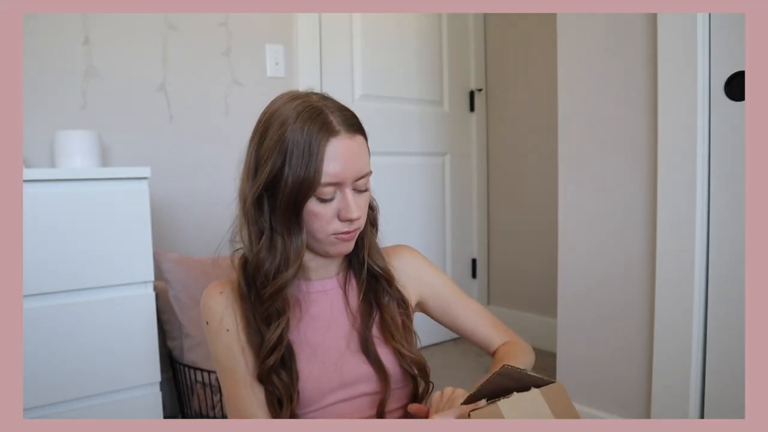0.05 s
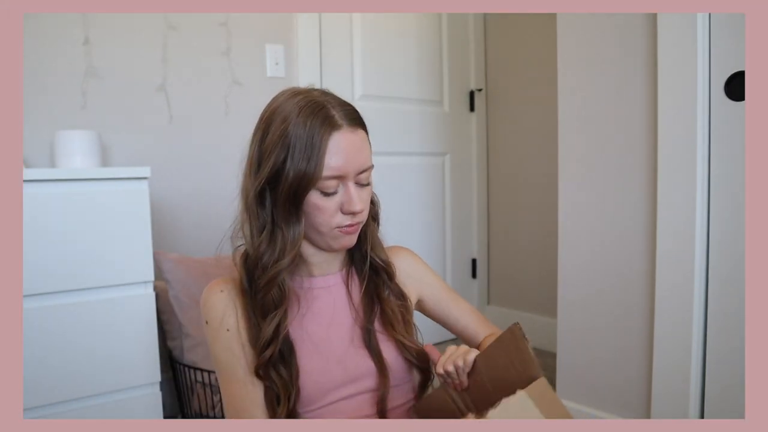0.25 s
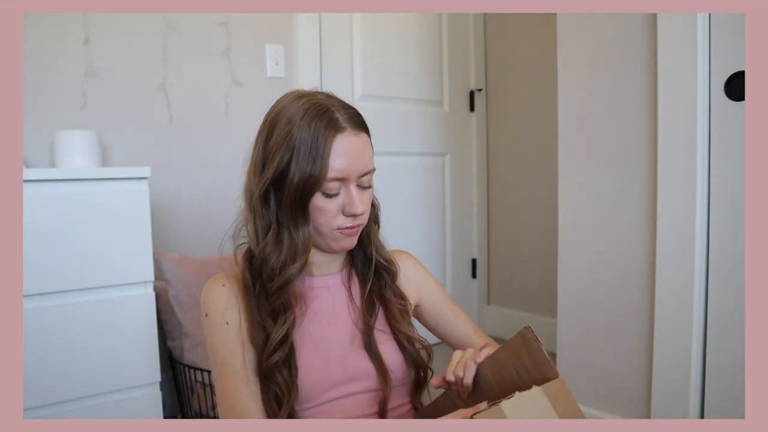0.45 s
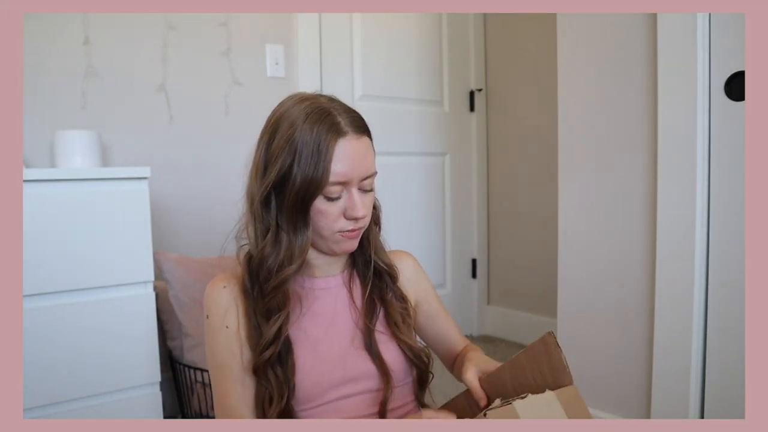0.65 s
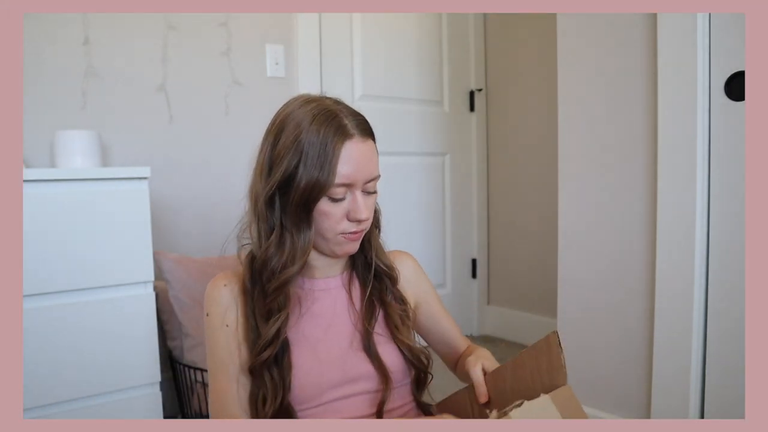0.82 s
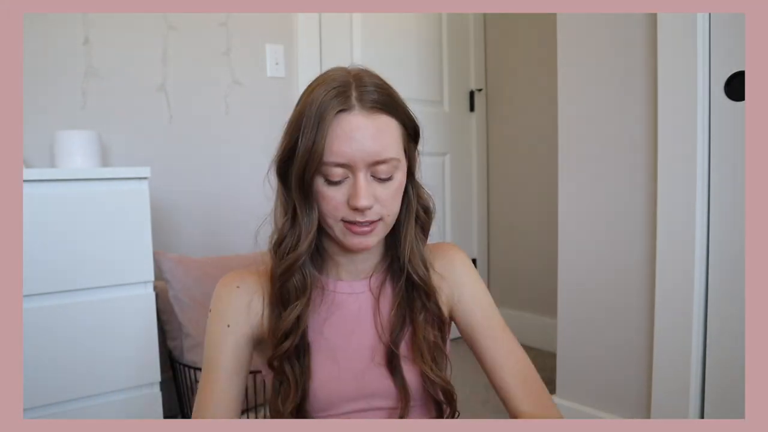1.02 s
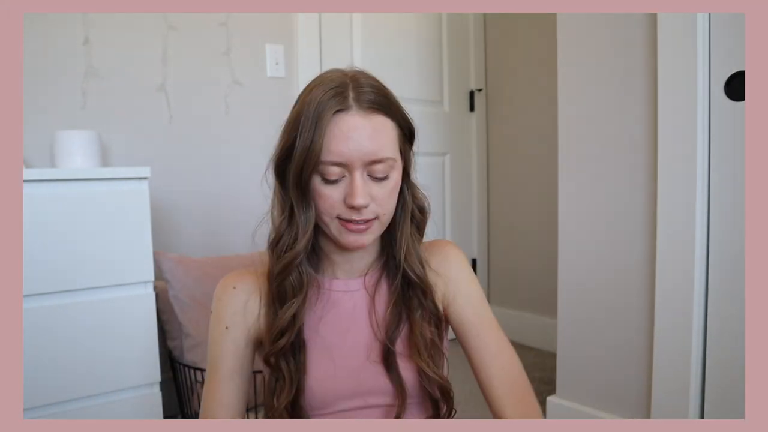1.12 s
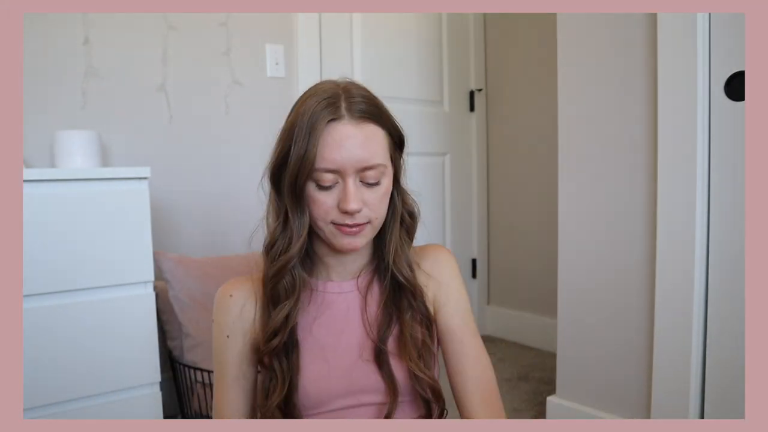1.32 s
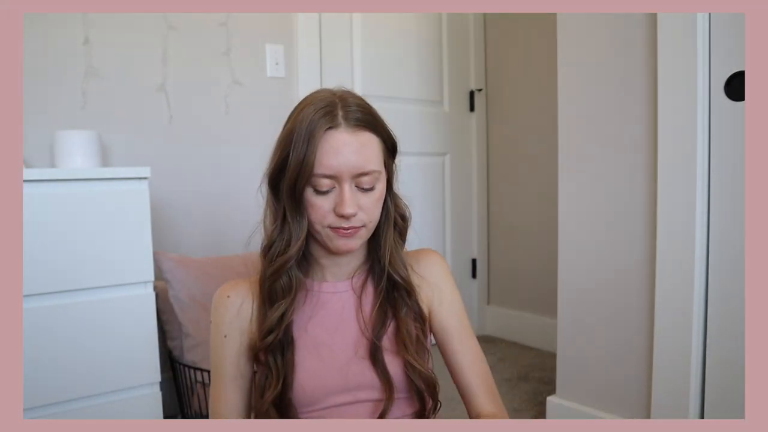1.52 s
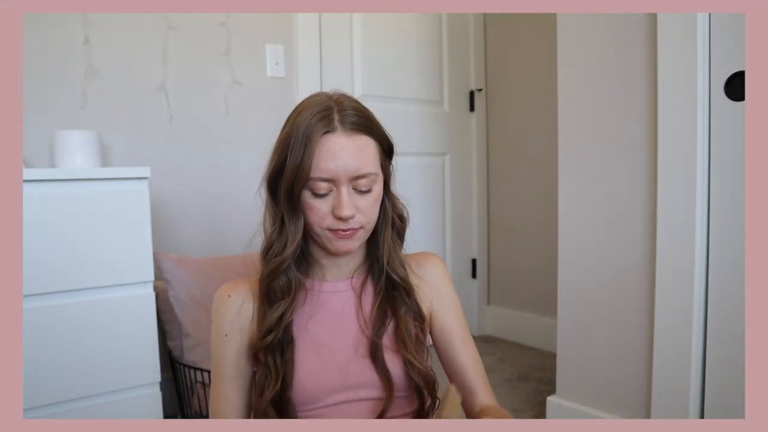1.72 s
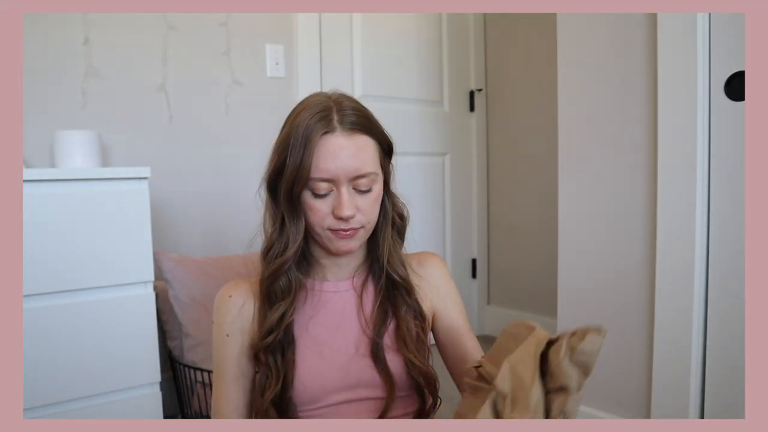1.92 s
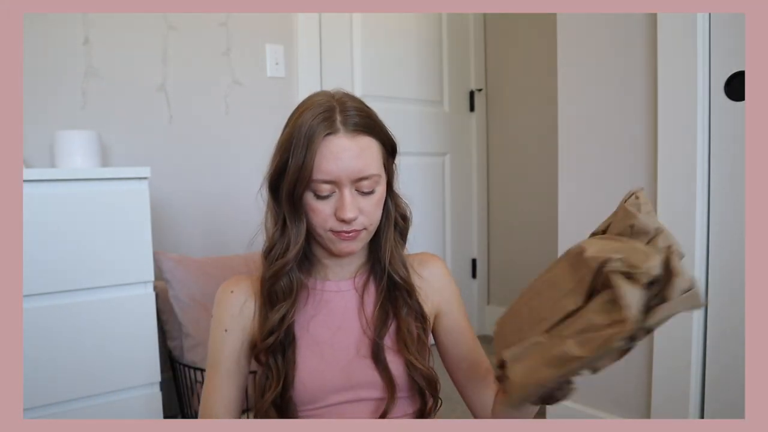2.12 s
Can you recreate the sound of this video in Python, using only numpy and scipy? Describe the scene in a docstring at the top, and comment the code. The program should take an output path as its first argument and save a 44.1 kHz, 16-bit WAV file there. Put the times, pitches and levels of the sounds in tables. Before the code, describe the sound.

Packing paper crinkles as it is pulled from a cardboard box after a flap slaps.

```python
"""Crumpled packing paper is pulled from a cardboard box in a small bedroom. Buckling makes its sound:
countless tiny facets merge into a dense rustle, and a few larger creases give way with sharp snaps.
Before that the box is opened: a flap slaps back and rattles, sliding hands raise friction noise,
and bumps excite the damped modes of the box. The level dips briefly just before the pull."""
import sys
import numpy as np
from scipy import signal
from scipy.fft import rfft, irfft, next_fast_len
from scipy.io import wavfile
from scipy.ndimage import uniform_filter1d

SR = 44100
rng = np.random.default_rng(int(sys.argv[2]) if len(sys.argv) > 2 else 0)


def unload_audio(sound):
    """Save the sound as a 16-bit wav file, at the path given as the first command line argument."""
    columns = np.transpose(np.atleast_2d(sound))
    # keep every value between -1 and 1, then stretch to whole-number steps
    steps = np.round(np.clip(columns, -1, 1) * 32767)
    wavfile.write(sys.argv[1], SR, steps.astype(np.int16))


N = 94815

# Reverberation time of the bedroom: frequency_hz, t60_s
ROOM_DECAY = [(100, 0.22), (300, 0.41), (1200, 0.51), (4000, 0.25), (14000, 0.2)]
# Background noise spectrum: frequency_hz, level_db
BACKGROUND_SPECTRUM = [(20, -5), (55, -1), (300, -4.5), (1000, -24), (3000, -28), (16000, -21)]
# Box panels ringing on: start_s, pitch_hz, level_db, t60_s
PANEL_RINGS = [(.262, 1211, -22, .26), (.262, 1136, -31, .42), (.562, 301, -26, .23),
               (1.796, 685, -14, .07)]
# Envelope of hands and flaps sliding on card: time_s, level_db
SLIDE_ENVELOPE = [(0, -41.5), (.09, -51), (.16, -41), (.2, -40.5), (.25, -30.5), (.295, -30.5),
                  (.35, -36.5), (.45, -51), (.52, -44.5), (.565, -34.5), (.64, -41), (.74, -41),
                  (.765, -45.5), (.81, -36), (.855, -46), (.92, -36), (.955, -27), (.995, -32.5),
                  (1.054, -40.5)]
# Friction spectrum of card: frequency_hz, level_db
CARD_SPECTRUM = [(100, -15), (280, 6.5), (500, 1.5), (1400, 1), (2500, -3.5), (5500, -2.5), (7000, -5.5),
                 (8800, -1), (10500, -11), (14000, -12), (16000, -21)]
# An edge rubbing the card: peak_s, level_db, centre_hz, t60_s
EDGE_RUBS = [(.28, -27.5, 1150, 0.32), (0.568, -27.5, 480, 0.1), (0.811, -29, 920, 0.086),
             (1.8, -16, 663, 0.026), (1.99, -45.5, 1380, .4)]
# Contact noise spectrum: frequency_hz, level_db
CONTACT_SPECTRUM = [(30, -21), (120, -5.5), (400, 1), (1400, -4), (2500, -12), (4500, -23), (16000, -24.5)]
# Bumps on the box: start_s, level_db, pitch_ratio, relative_contact_db
BOX_BUMPS = [(0.2259, -3, 1.28, -30), (0.2401, -14.5, 1.06, -9), (0.7724, -11.5, 1.34, -9.5),
             (0.7855, -7, 0.958, -5), (0.985, -15.5, 1.42, -11), (1.649, -23.5, 0.74, 12.5)]
# Box modes, scaled by each bump: nominal_hz, level_db, t60_s
BOX_MODES = [(197, 0, 0.05), (243.7, -10.5, 0.12), (405, -10.5, 0.052), (1380, -8.5, 0.019)]
# Impacts of the flap: start_s, level_db
FLAP_IMPACTS = [(0.2102, -1), (0.2156, -4.5), (0.2269, -1), (0.2377, -6)]
# Flap modes: nominal_hz, level_db, t60_s
FLAP_MODES = [(350, -9, .04), (490, -6, .022), (632, 3.5, .04), (887, -13, .05)]
# Spectrum of a flap impact: frequency_hz, level_db
CRACK_SPECTRUM = [(40, -15), (200, 1.5), (600, 8.5), (1400, 6), (2500, -3.5), (5000, -4), (6800, -10),
                  (8800, -9), (11000, -15.5), (16000, -21)]
# Facets of card or paper flipping over: start_s, level_db, centre_hz, t60_s
FACET_POPS = [(.563, -34, 1240, 0.13), (0.616, -26, 7200, 0.027), (1.4247, -11, 5940, 0.0099),
              (1.98, -30.5, 1560, 0.06), (2.097, -30, 2150, 0.035)]
# Single creases snapping: start_s, level_db, centre_hz, t60_s
CREASE_SNAPS = [(0.142, -24.5, 7200, 0.011), (.156, -24.5, 7060, 0.011), (0.9646, -15, 9200, 0.0064),
                (0.9848, -14, 2600, 0.081), (1.134, -20, 9700, 0.021), (1.168, -10.5, 1710, 0.013),
                (1.32, -5, 5700, 0.01), (1.34, -9.5, 6150, 0.016), (1.391, -16, 1530, 0.046),
                (1.537, -10, 8100, 0.024), (1.6208, -9, 5640, 0.021), (1.65, -12, 2030, 0.047),
                (1.732, -7.5, 5760, 0.007), (1.794, -14, 3580, 0.058), (1.806, -15, 11800, 0.071),
                (1.868, -21, 4930, 0.16), (2.129, -32, 5000, 0.026)]
# Envelope of the pull on the paper: time_s, level_db
PULL_ENVELOPE = [(1.084, -45), (1.128, -33), (1.15, -27), (1.18, -22), (1.21, -30.5), (1.24, -23.5),
                 (1.295, -28), (1.33, -16), (1.4, -22.5), (1.485, -30.5), (1.55, -20), (1.67, -18),
                 (1.75, -18.5), (1.8, -16.5), (1.835, -22), (1.94, -38), (2.08, -45.5), (2.133, -47),
                 (2.15, -28.5)]
# Rustle spectrum of the paper: frequency_hz, level_db
PAPER_SPECTRUM = [(40, -42), (81, -27), (190, -12), (272, -5), (500, -6.5), (673, -1.5), (2150, -4.5),
                  (6120, -7), (7370, -9), (8600, -6), (10500, -13), (15500, -17)]

DIP_START_S, DIP_END_S, DIP_DB = 1.054, 1.084, -11


def amp(db):
    """Decibels to amplitude ratio."""
    return 10 ** (np.asarray(db) / 20)


def unit_rms(x):
    """Normalisation to rms 1."""
    return x / np.sqrt(np.mean(x ** 2) + 1e-20)


def at_frequency(points, hz):
    """Interpolation on a logarithmic frequency axis."""
    frequencies, values = np.transpose(points)
    return np.interp(np.log(hz + 1), np.log(frequencies + 1), values)


def since(start_s):
    """Seconds from start_s to each sample."""
    return np.arange(N) / SR - start_s


def envelope(points):
    """Gain interpolated in decibels over time."""
    return amp(np.interp(since(0), *np.transpose(points)))


def decay(start_s, t60_s, attack_s):
    """Exponential damping after a quick rise."""
    t = np.maximum(since(start_s), 0)
    return amp(-60 * t / t60_s) * (1 - np.exp(-t / attack_s))


def filtered(x, response):
    """Linear filtering: the spectrum times a frequency response."""
    size = next_fast_len(N + SR // 2)
    return irfft(rfft(x, size) * response(np.fft.rfftfreq(size, 1 / SR)), size)[:N]


def radiated(x, cutoff_hz):
    """Radiation efficiency: small surfaces emit little bass."""
    return signal.sosfilt(signal.butter(2, cutoff_hz, "highpass", fs=SR, output="sos"), x)


def noise(spectrum, centre_hz=None, q=1, order=1):
    """Spectrally shaped noise of rms 1, optionally through a resonance."""
    def response(hz):
        colour = amp(at_frequency(spectrum, hz))
        if centre_hz is None:
            return colour
        damping = 1j * hz * centre_hz / q
        return colour * (damping / (centre_hz ** 2 - hz ** 2 + damping)) ** order
    return unit_rms(filtered(rng.standard_normal(N), response))


def ring(modes, start_s, attack_s, pitch_ratio=1):
    """Modal superposition: a struck body sounds as a sum of damped sinusoids."""
    phase = 2 * np.pi * pitch_ratio * since(start_s)
    return sum(amp(db) * np.sin(hz * phase) * decay(start_s, t60, attack_s) for hz, db, t60 in modes)


def crackle(spectrum, per_s=2000, spread_db=3, decay_cycles=2.5, pool=12000):
    """Random superposition: tiny damped pulses of uneven size and pitch merge into a crackle."""
    count = min(int(per_s * N / SR), pool)
    onsets = (rng.random((pool, 3))[:count, :1] * N).astype(int)
    octaves = 1.222 * rng.standard_normal(pool)[:count, None]
    size_db = spread_db * np.minimum(rng.exponential(size=pool)[:count, None], 4.5)
    hz = np.clip(5010 * 2 ** octaves, 300, 15000)
    age = np.arange(SR // 200)
    cycles = hz * age / SR
    pulses = amp(size_db) * np.sqrt(hz) * np.exp(-cycles / decay_cycles) * np.sin(2 * np.pi * cycles)
    bins = rfft(np.bincount((onsets + age).ravel(), pulses.ravel(), N)[:N])
    # whitened, so that the sheet alone sets the colour
    power = np.abs(uniform_filter1d(np.abs(bins) ** 2, size=1500))
    white = bins / np.sqrt(power + 1e-9)
    colour = amp(at_frequency(spectrum, np.fft.rfftfreq(N, 1 / SR)))
    return unit_rms(irfft(white * colour, N))


def background(level_db=-50.5):
    """Stationary noise: a faint rumble and hiss."""
    return amp(level_db) * noise(BACKGROUND_SPECTRUM)


def room(x, build_s=0.0019):
    """Reverberation: convolution with a diffuse tail that lasts longest in the midrange."""
    hz, t, bins = signal.stft(rng.standard_normal(SR // 2), SR, nperseg=256)
    absorption = amp(-60 * t / at_frequency(ROOM_DECAY, hz)[:, None])
    tail = signal.istft(bins * absorption, SR, nperseg=256)[1]
    tail *= 1 - np.exp(-np.arange(len(tail)) / SR / build_s)
    return signal.fftconvolve(x, tail / np.linalg.norm(tail))[:N]


def panels():
    """Free vibration: box panels ring on faintly after a push."""
    return sum(ring([mode], start_s, attack_s=0.0017) for start_s, *mode in PANEL_RINGS)


def sliding(hiss_db=0.5, grain_db=-3):
    """Sliding friction: the card hisses and crackles, and the sound ends abruptly where the level dips."""
    friction = amp(hiss_db) * noise(CARD_SPECTRUM) + amp(grain_db) * crackle(CARD_SPECTRUM)
    return envelope(SLIDE_ENVELOPE) * (since(DIP_START_S) < 0) * friction


def rubs(rise_s=0.013):
    """Forced vibration: a rubbing edge drives one broad resonance of the card."""
    out = np.zeros(N)
    for peak_s, db, hz, t60 in EDGE_RUBS:
        t = since(peak_s)
        swell = np.exp(np.minimum(t, 0) / rise_s) * amp(-60 * np.maximum(t, 0) / t60)
        out += amp(db) * swell * noise(CONTACT_SPECTRUM, hz, q=2.6, order=2)
    return out


def bumps(contact_t60_s=0.029, attack_s=0.00084):
    """Impact excitation: soft knocks ring the hollow box, each with a burst of contact noise."""
    out = np.zeros(N)
    for start_s, db, pitch_ratio, contact_db in BOX_BUMPS:
        contact = amp(contact_db) * noise(CONTACT_SPECTRUM) * decay(start_s, contact_t60_s, attack_s)
        out += amp(db) * (ring(BOX_MODES, start_s, attack_s, pitch_ratio) + contact)
    return out


def flap(crack_room_db=-11, hollow_room_db=-18):
    """Repeated impact: the flap rattles in broadband cracks, and the first excites its modes."""
    cracks = sum(amp(db) * noise(CRACK_SPECTRUM) * decay(start_s, t60_s=0.02, attack_s=0.00019)
                 for start_s, db in FLAP_IMPACTS)
    hollow = ring(FLAP_MODES, FLAP_IMPACTS[0][0], attack_s=0.0036, pitch_ratio=0.99)
    return cracks + hollow + room(amp(crack_room_db) * cracks + amp(hollow_room_db) * hollow)


def pops(attack_s=0.00027):
    """Snap-through: small facets flip over with a soft, pitched tick."""
    return sum(amp(db) * noise(PAPER_SPECTRUM, hz, q=2.2, order=2) * decay(start_s, t60, attack_s)
               for start_s, db, hz, t60 in FACET_POPS)


def snaps(click_db=10, click_decay_cycles=0.66, q_per_hz=0.000067):
    """Release of elastic energy: a crease gives way with a click, then the sheet shivers."""
    out = np.zeros(N)
    for start_s, db, hz, t60 in CREASE_SNAPS:
        cycles = hz * np.maximum(since(start_s), 0)
        click = np.sin(2 * np.pi * cycles) * np.exp(-cycles / click_decay_cycles)
        shiver = noise(PAPER_SPECTRUM, hz, q=q_per_hz * hz) * decay(start_s, t60, attack_s=0.0004)
        out += amp(db) * (amp(click_db) * click + shiver)
    return out


def paper(sheet_db=-2, crisp_db=-3, crisp_hz=9700, reference_pull_db=-21):
    """Buckling and friction: the rustle follows the pull, and sharp crackles grow as its square."""
    def treble(hz):
        return 1 / (1 + (crisp_hz / (hz + 1)) ** 8)
    pull = envelope(PULL_ENVELOPE) * (since(DIP_END_S) > 0)
    sheet = amp(sheet_db) * (crackle(PAPER_SPECTRUM) + noise(PAPER_SPECTRUM))
    soft = filtered(sheet, lambda hz: 1 - treble(hz) / 2)
    crisp = filtered(crackle(PAPER_SPECTRUM, per_s=1300, spread_db=2.8), treble)
    crisp_gain = amp(crisp_db) * pull / amp(reference_pull_db)
    return pull * (soft + crisp_gain * crisp)


def scene(knock_room_db=-10, rustle_room_db=-12):
    """Superposition: box, paper and reverberation dip briefly together over a steady background."""
    knocks = radiated(bumps(), cutoff_hz=106)
    rustle = sliding() + rubs() + paper() + pops() + radiated(snaps(), cutoff_hz=537)
    sound = flap() + panels() + knocks + rustle
    sound += amp(knock_room_db) * room(knocks) + amp(rustle_room_db) * room(rustle)
    dip = np.where((since(DIP_START_S) > 0) & (since(DIP_END_S) < 0), amp(DIP_DB), 1)
    return (sound * dip + background())[None]


def record(dry):
    """Clipping and band limiting: peaks flatten at full scale, and the highest treble is removed."""
    clipped = np.clip(dry[0], -1, 1)
    return filtered(clipped, lambda hz: hz < 15800)[None]


dry = scene()
out = record(dry)
unload_audio(out)
```